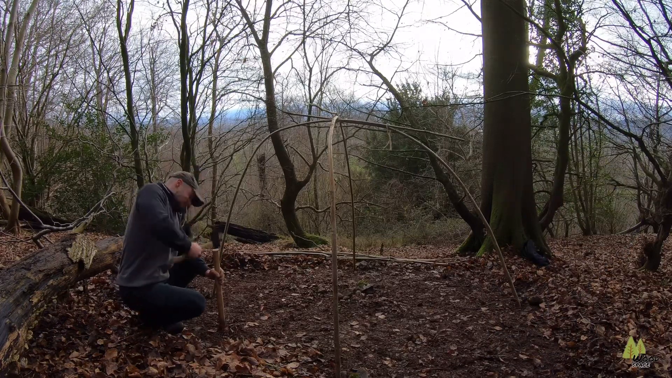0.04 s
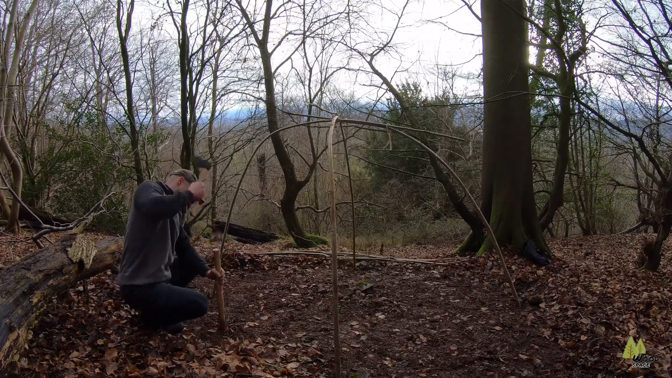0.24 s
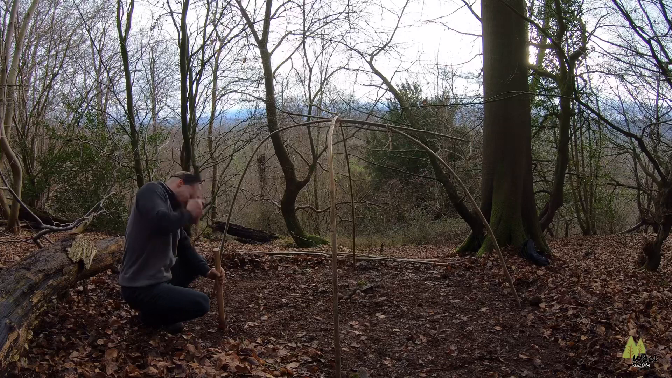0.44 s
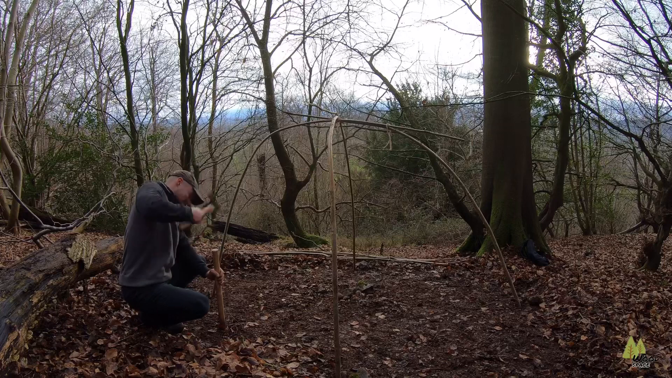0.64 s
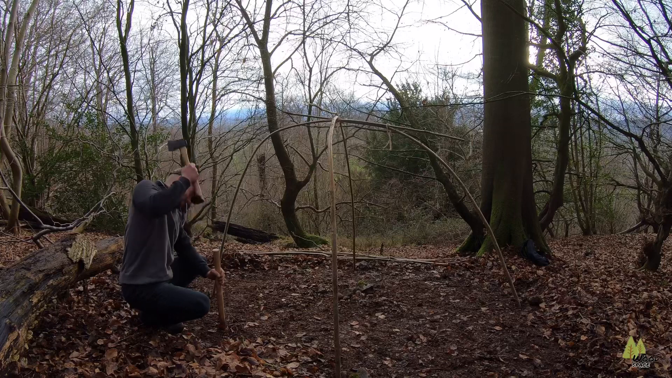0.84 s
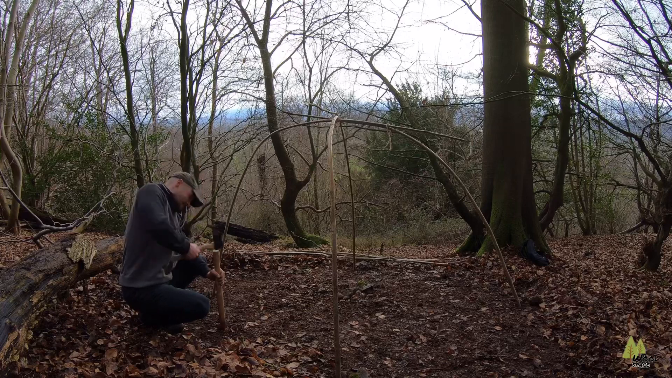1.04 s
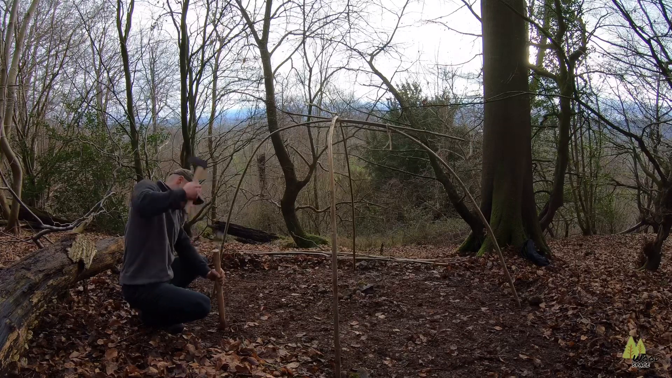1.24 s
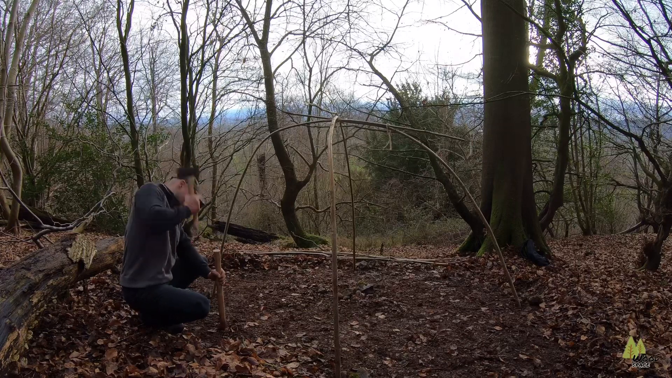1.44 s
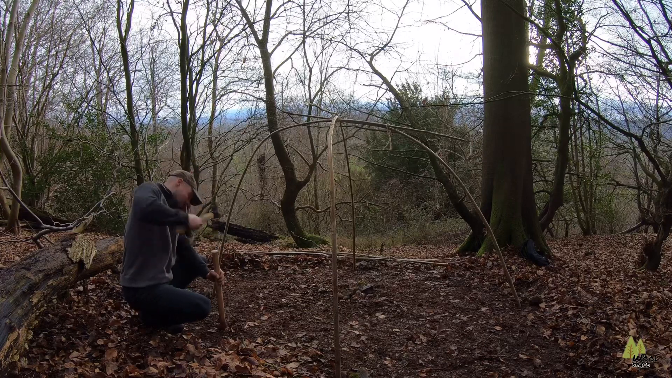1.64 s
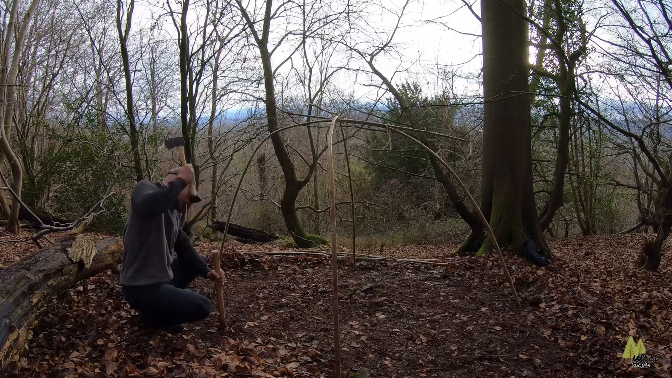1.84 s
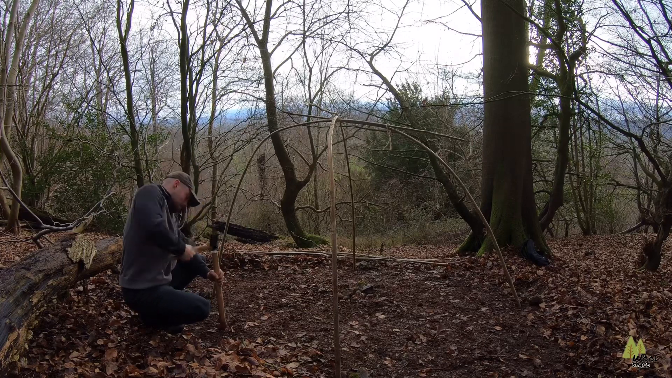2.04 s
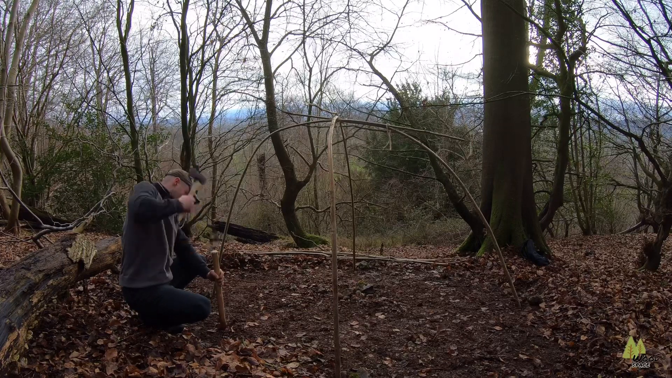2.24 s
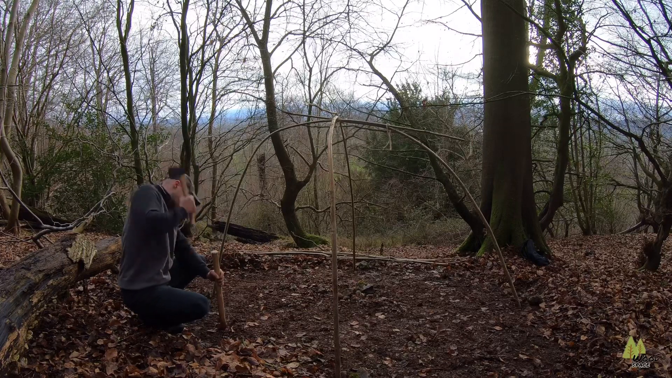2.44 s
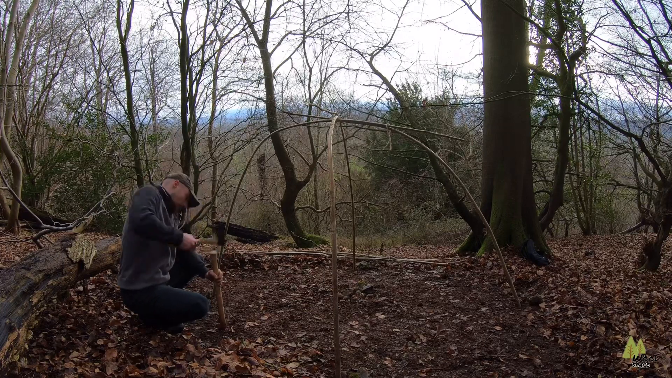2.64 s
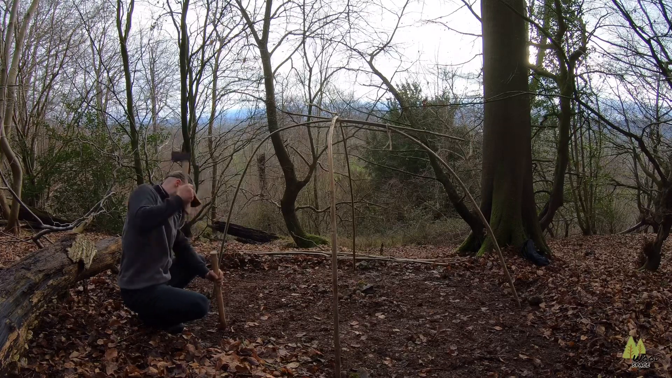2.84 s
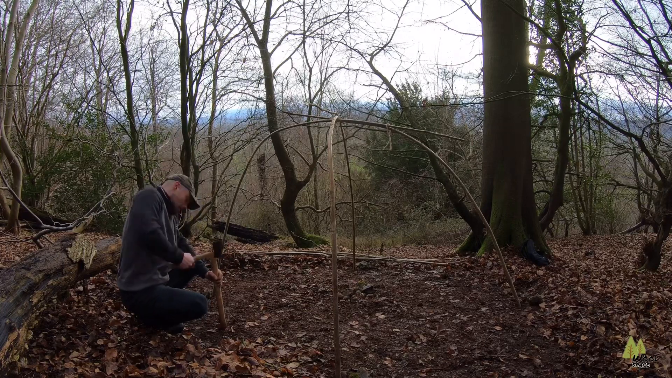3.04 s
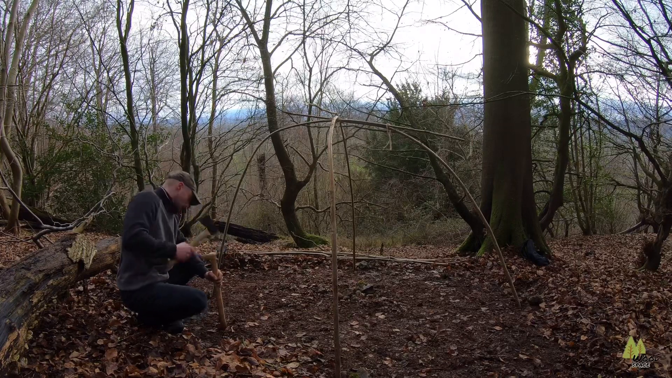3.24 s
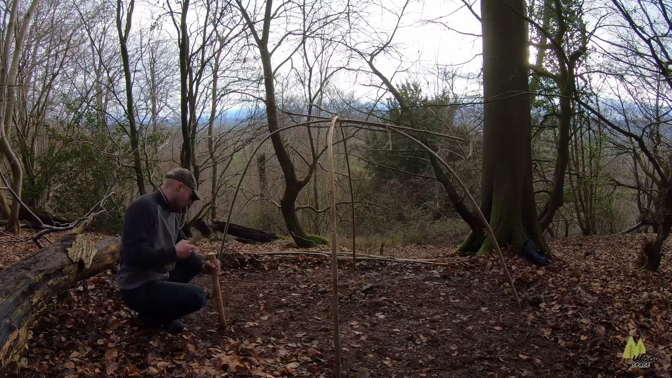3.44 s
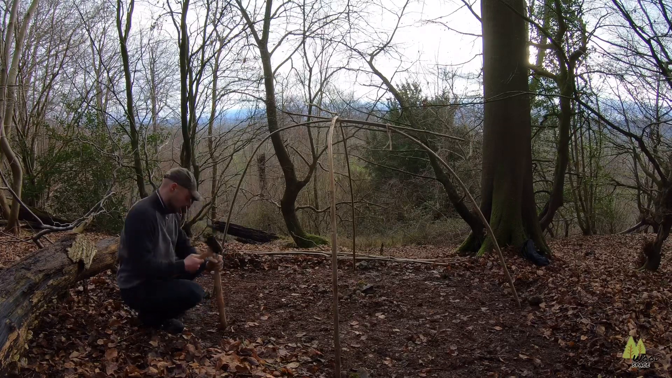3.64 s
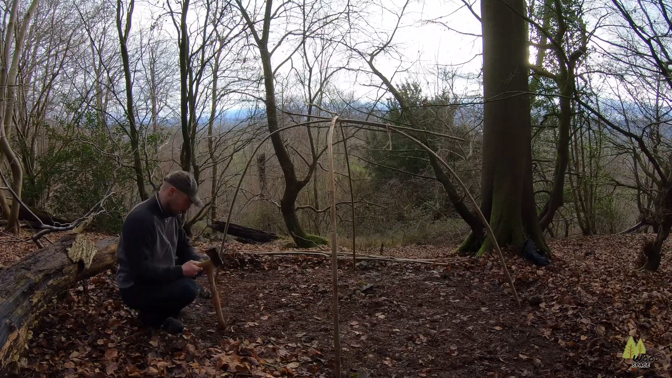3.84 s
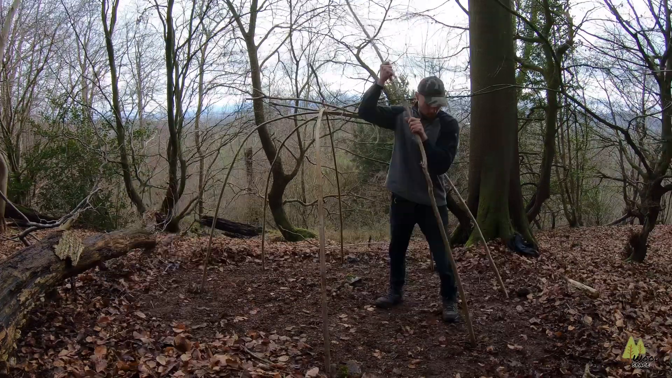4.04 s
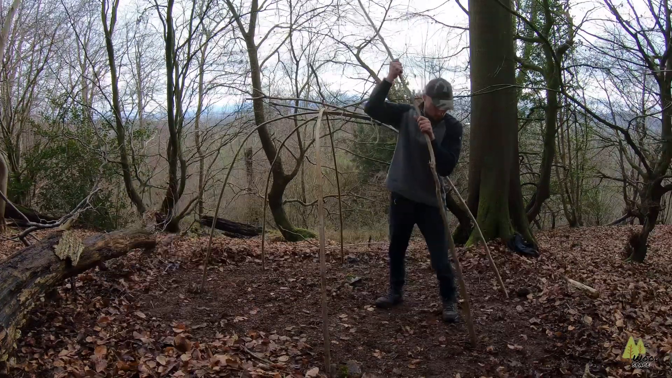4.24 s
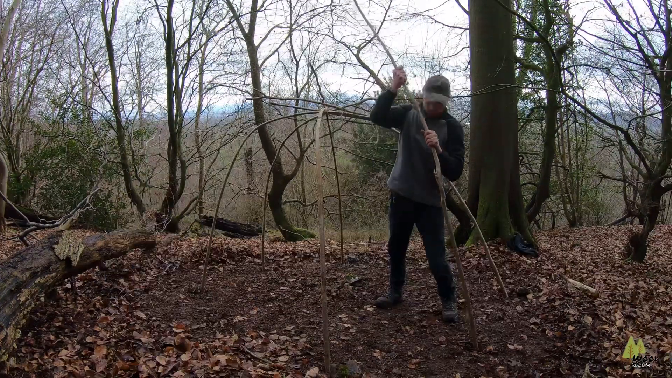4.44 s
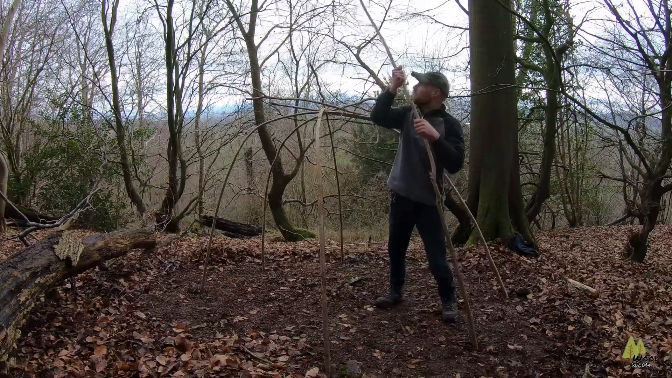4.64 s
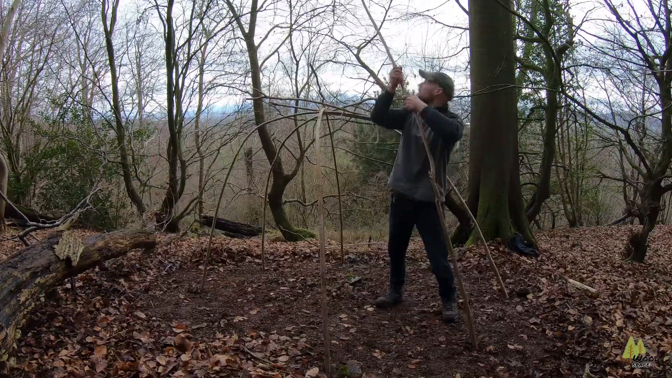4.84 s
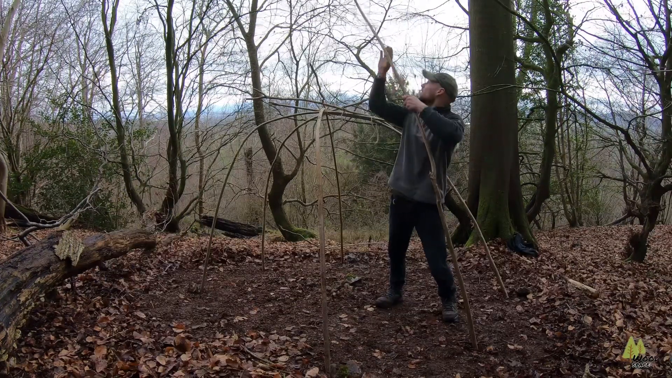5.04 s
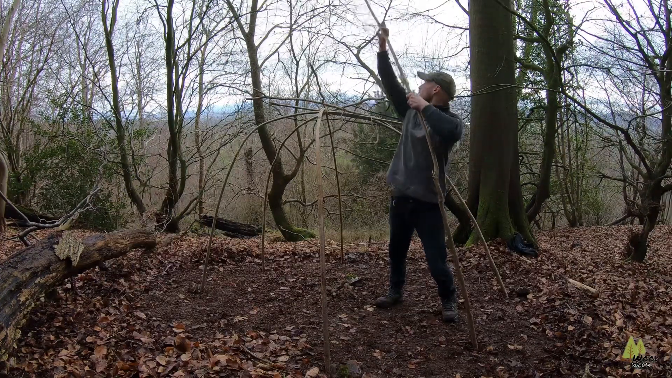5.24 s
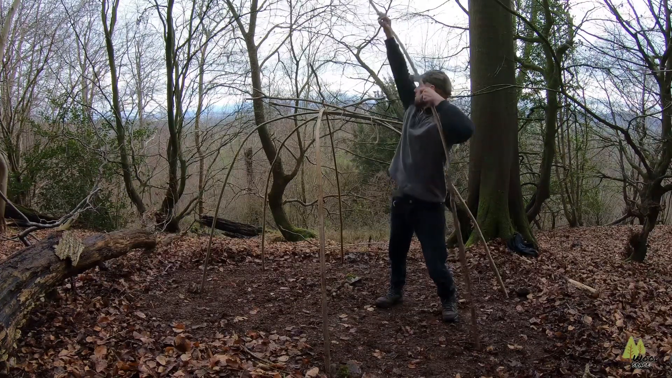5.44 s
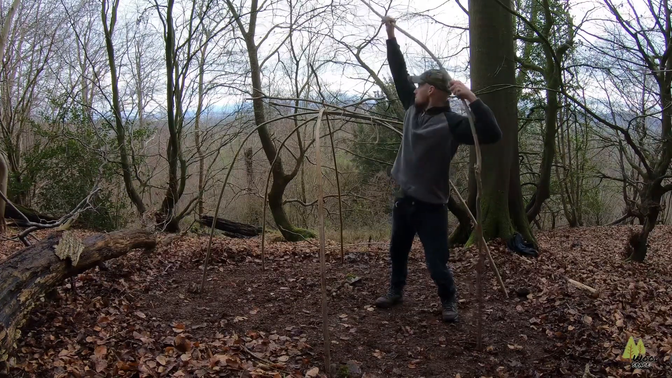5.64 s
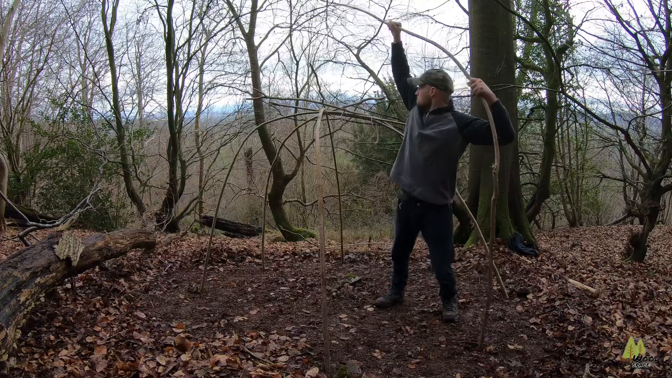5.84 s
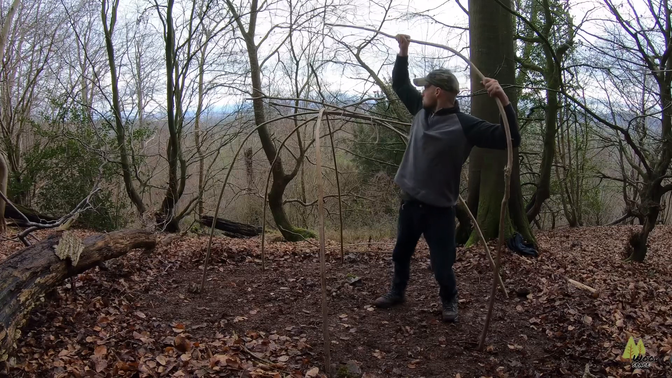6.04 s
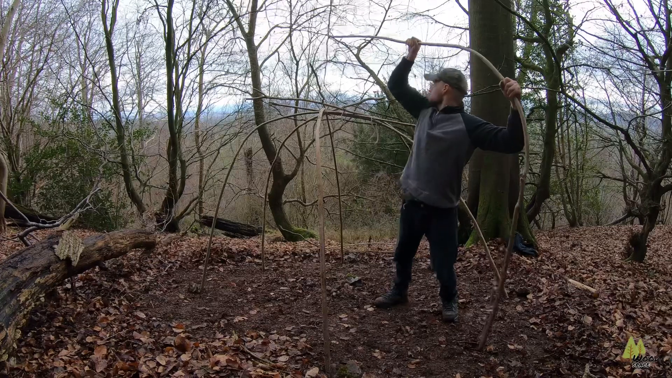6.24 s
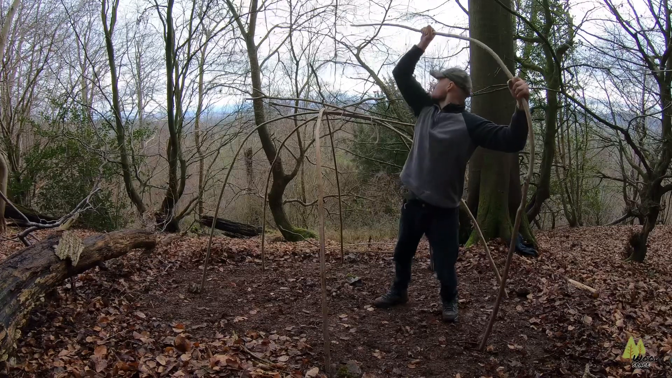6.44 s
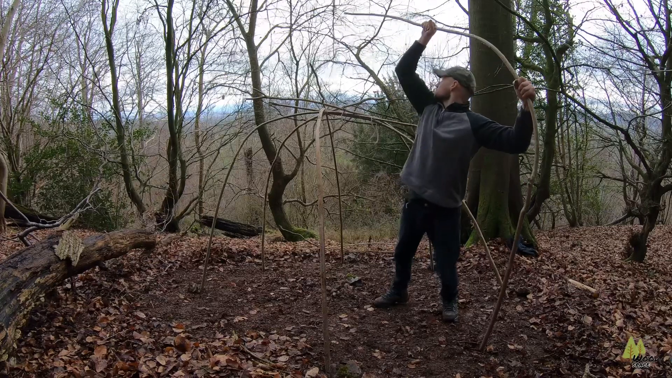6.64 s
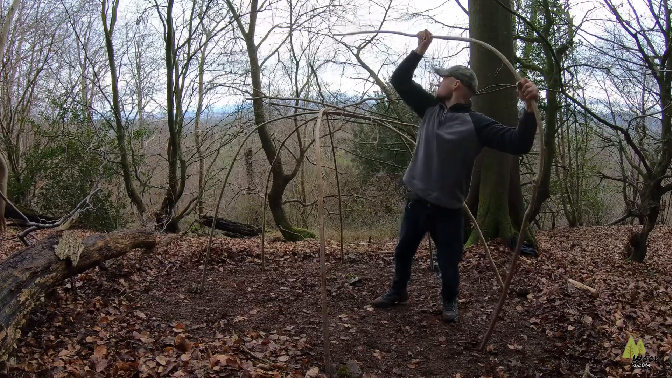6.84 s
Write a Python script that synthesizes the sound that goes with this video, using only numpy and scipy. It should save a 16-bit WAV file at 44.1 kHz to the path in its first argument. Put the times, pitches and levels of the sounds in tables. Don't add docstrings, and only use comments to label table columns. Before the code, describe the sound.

A stake is hammered twice a second among bare trees, woody cracks echoing; after a cut, a deeper thump, twig snaps, leaf rustle and wind puffs.

```python
import sys
import numpy as np
from scipy import signal
from scipy.io import wavfile
from scipy.ndimage import uniform_filter1d

SR = 44100
rng = np.random.default_rng(int(sys.argv[2]) if len(sys.argv) > 2 else 0)


def decibels_to_gain(level_db):
    exponent = np.asarray(level_db, float) / 20
    return 10 ** exponent


def int16_out(signal):
    q = np.round(np.clip(np.atleast_2d(signal).T, -1, 1) * 32767)
    wavfile.write(sys.argv[1], SR, q.astype(np.int16))


N = 304274

CUT_S = (4.058, 4.112)

# (frequency [Hz], level per Hz [dB])
AIR_SPECTRUM = [(15, -42), (25, -8), (64, 0), (118, -8.5), (151, 4.5), (208, 6), (315, -8.5), (945, -3),
                (1300, -8), (1870, -19.5), (2050, -23), (2300, -21.5), (2990, -43.5), (5060, -120)]
AIR_DB = (-60.5, -58.5)
TREETOP_DB, QUIET_TOP_HZ = -83, 11000

# (start [s], length [s], level [dB], tread weight [0 light to 1 heavy])
RUSTLES = [(3.388, 0.15, -76.5, 0.23), (3.672, .015, -90, 0.4), (3.728, 0.2, -79, 0.76),
           (4.361, 0.058, -60, .4), (4.384, 0.13, -59.5, 0.2), (4.59, 0.017, -58.5, .2),
           (4.689, 0.16, -72, 0.18), (4.862, 0.2, -70.5, 0.16), (5.223, 0.048, -69, 0.07),
           (5.346, 0.075, -66.5, 0.21), (5.595, 0.064, -57, 0.23), (5.693, 0.05, -54.5, 0.39),
           (5.796, 0.015, -66, .4), (5.925, 0.12, -55.5, 0.58), (5.946, 0.029, -65.5, 1.08),
           (6.15, .05, -76, 0.66), (6.35, .25, -77, 0.7), (6.611, 0.11, -74.5, 0.46),
           (6.769, 0.054, -78, .2)]
RUSTLE_ATTACK_S, RUSTLE_RELEASE_S = .012, .028
BODY_DB, TREBLE_DB = (-13, 24), (2.5, -49.5)
LITTER_DB, LITTER_WEIGHT = (-83, -72.5), 0.05

# (time [s], peak level [dB], bending mode [Hz], bending level [dB], upper mode level [dB])
BLOWS = [
    (0.0643, -5.5, 810, -14.5, 1.5),
    (0.5558, -6.5, 850, -14, 1.5),
    (1.0632, -5, 850, -18, -2.5),
    (1.562, -3.5, 845, -21, -3),
    (2.0567, -4, 740, -20.5, -10.5),
    (2.5729, -13, 950, -2.5, -6),
    (3.0587, -7, 950, -15.5, -7),
]
# (length mode [Hz], upper mode [Hz], thud [dB], far echo [dB], echo tilt [dB per octave])
LANDINGS = [
    (2300, 3640, -17, -15.5, 3.5),
    (2270, 3530, -15.5, -15, 0.5),
    (2330, 3370, -15, -14.5, 1),
    (2350, 3530, -15, -14, 0.5),
    (2294, 3550, -15.5, -16, -1),
    (2230, 4050, -13, -34.5, -3),
    (2153, 3500, -15.5, -17, -1),
]
# (frequency [Hz], level [dB], left minus right [dB])
SIDE_MODES = [(1674, -13.5, 6.5), (3185, -9, -3.5), (4330, -17, 3.5), (5360, -24, 8), (7096, -34.5, 5)]
# (frequency [Hz], level [dB], t60 [s])
HEAD_RING = [(4100, -45, .35), (7500, -62, .4)]
LEAD_S, CONTACT_S = 0.00028, 0.002
AFTER_DB, AFTER_S = -11, 0.0024
CRACK_DB, CRACK_PER_TILT = -38.5, 2.2

# (frequency [Hz], level [dB], t60 [s])
TRUNK_BANDS = [(403.7, -64.5, 0.63), (740, -59, 0.48), (965, -49, 0.67), (1512, -42, 0.57),
               (1950, -42.5, 1), (2630, -42, 0.99), (3500, -44.5, 0.82), (5700, -53, 0.6),
               (6670, -56, 0.21), (8600, -61, 0.14)]
BLOOM_S, NEAR_S = .135, 0.083
TRUNK_LIKE = 0.5
NEAR_DB, NEAR_PER_TILT = -7, -1.1

# (frequency [Hz], level [dB], spread [s])
SOIL_PACKETS = [(179.8, -1, .0058), (75, -15.5, 0.011), (252, -13, 0.0021), (135, -11, 0.0027)]
ARRIVALS_S = (.0117, .014, .0095, .024)
# (delay [s], level [dB], side level [dB])
SOIL_ECHOES = [(0.041, -26.5, -3), (.05, -27.5, -16.5)]
# (time [s], level [dB], pitch ratio [1])
POLE = (4.3883, -16, .88)
RUMBLE_DB, RUMBLE_S = -22, .045

# (start [s], length [s], pitch [Hz], level [dB], sag [Hz per s])
BIRDS = [
    (.33, .17, 7450, -88, 3000),
    (.72, .22, 7250, -88, 1500),
    (2.82, .15, 4090, -80, 300),
    (3.46, .32, 7170, -80, 200),
    (3.8, .13, 7050, -91, 800),
    (3.79, .28, 5150, -83, 100),
]
BIRD_EDGE_S = .025

# (time [s], peak level [dB], mode [Hz], treble level [dB])
SNAPS = [(4.3880, -15.5, 333, -25), (4.3888, -16.5, 2440, -9.5), (4.3922, -16.5, 3240, -37),
         (4.4223, -12, 3500, -43), (4.4294, -45, 2430, -24), (4.6106, -36.5, 3400, -7.5),
         (4.8771, -57, 3700, -0.5), (5.129, -64, 3220, 10.5), (5.2335, -48, 5700, -5),
         (5.3948, -43, 5200, -17), (5.5144, -54, 5030, -3), (5.5946, -35.5, 2620, 1.5),
         (5.5985, -28.5, 5030, -17), (5.6148, -42.5, 2580, 7), (5.6323, -37, 2460, -6),
         (5.6411, -33.5, 3500, -18), (5.7159, -35, 2730, -31), (5.744, -39.5, 3470, -24.5),
         (5.8104, -43, 3150, -18), (5.934, -35.5, 3040, -35), (5.9472, -36, 3060, -34),
         (5.9623, -38, 3500, -29), (5.986, -26.5, 2900, -37), (6.0174, -40, 2820, -34),
         (6.0551, -33, 2500, -26), (6.1588, -47.5, 2960, -24), (6.3204, -51.5, 3550, -23),
         (6.6555, -55, 3280, 7.5), (6.7854, -66, 3800, -21), (6.8104, -55, 3670, -10.5)]
SNAP_PAN_DB = -1

# (start [s], length [s], level [dB], left minus right [dB])
GUSTS = [
    (4.88, 0.086, -66, 3),
    (5.15, 0.089, -62, 6),
    (5.4, 0.6, -71, 4),
    (5.928, 0.21, -54.5, 10),
    (6.15, 0.41, -66, 10.5),
    (6.499, 0.026, -48.5, -6),
    (6.603, 0.17, -54, 3),
]
GUST_EDGE_S = .04

GHOST_S = .0107
GHOST_DB, LOW_GHOST_DB = (-28, -44), -21

APART = np.array([[1], [-1]])


def band(x, lo_hz, hi_hz, order=2):
    edges = [lo_hz, min(hi_hz, .45 * SR)]
    return signal.sosfilt(signal.butter(order, edges, "band", fs=SR, output="sos"), x)


def unit(x):
    return x / np.sqrt(np.mean(x ** 2))


def pan(db):
    return decibels_to_gain(np.array([db, -db]) / 2).reshape(2, -1)


def add(out, s, x):
    i = int(s * SR)
    out[:, i:i + x.shape[-1]] += x[..., :N - i]


def curves(start, length, attack, release):
    t = np.arange(N) / SR - start
    return np.clip(t / attack, 0, 1) ** 2 * np.exp(-np.clip(t - length, 0, None) / release)


def walk(rate):
    k = int(SR / rate)
    held = np.repeat(rng.standard_normal(N // k + 1), k)
    return 1.3 * uniform_filter1d(uniform_filter1d(held, k), k)[:N]


def air():
    out, (hz_at, db_at) = 0, np.transpose(AIR_SPECTRUM)
    for hz in 30 * 2 ** np.arange(0, 7, 1 / 3):
        mid, side = band(rng.standard_normal((2, N)), hz / 1.18, hz * 1.18)
        db = np.interp(np.log(hz), np.log(hz_at), db_at) + walk(6)
        width = np.clip(0.2 + hz / 1500., 0, .8)
        out = out + decibels_to_gain(db) * (mid + width * side * APART)
    treetops = decibels_to_gain(TREETOP_DB) * unit(band(rng.standard_normal((2, N)), 1800, 5500))
    level = decibels_to_gain(np.where(np.arange(N) / SR < CUT_S[1], *AIR_DB))
    return unit(out) * level + treetops


def leaves():
    struck = rng.random((3, N)) < .2
    size = decibels_to_gain(2.8 * np.minimum(rng.exponential(size=(3, N)), 6))
    grains = rng.standard_normal((3, N)) * struck * size
    grains = grains[0] + .6 * grains[1:]
    clumps = decibels_to_gain(2.8 * walk(160))
    middle = unit(band(grains, 2100, 4200, order=3))
    body = unit(band(grains, 220, 2800, order=3))
    treble = unit(band(grains, 4460, 8600, order=3))

    def tread(weight):
        body_gain = decibels_to_gain(BODY_DB[0] + BODY_DB[1] * weight)
        treble_gain = decibels_to_gain(TREBLE_DB[0] + TREBLE_DB[1] * weight)
        return middle + body_gain * body + treble_gain * treble

    stir_db = np.where(np.arange(N) / SR < CUT_S[1], *LITTER_DB) + 1.79 * walk(9)
    out = decibels_to_gain(stir_db) * tread(LITTER_WEIGHT)
    for s, length, db, weight in RUSTLES:
        swell = curves(s, length, RUSTLE_ATTACK_S, RUSTLE_RELEASE_S)
        out = out + decibels_to_gain(db) * clumps * swell * tread(weight)
    return out


def stake():
    out, t = np.zeros((2, N)), np.arange(9000) / SR
    rise = np.sin(np.pi / 2 * np.clip(t / .0009, 0, 1)) ** 2
    held = rise / (1 + (t / CONTACT_S) ** 5) + decibels_to_gain(AFTER_DB) * rise * np.exp(-t / AFTER_S)
    turn = 2 * np.pi * (t - .0014)
    for (s, db, bend_hz, bend_db, upper_db), (hz, upper_hz, *_, tilt_db) in zip(BLOWS, LANDINGS):
        modes = decibels_to_gain(-1.5) * np.sin(hz * turn) * pan(2.3)
        modes = modes + decibels_to_gain(upper_db - 3.0) * np.sin(upper_hz * turn) * pan(-3.7)
        modes = modes + sum(decibels_to_gain(d) * np.cos(f * turn) * pan(p) for f, d, p in SIDE_MODES)

        grit = rng.standard_normal((2, len(t)))
        crack = unit(band(grit[0] + .6 * grit[1] * APART, 6500, 12000)) * pan(2.5)
        crack = decibels_to_gain(CRACK_DB + CRACK_PER_TILT * tilt_db) * crack

        bend_fade = rise / (1 + (t / .003) ** 4)
        bend = decibels_to_gain(.85 * bend_db + 1.5) * np.cos(bend_hz * turn) * bend_fade * pan(2.5)

        fibres = unit(band(grit[1] + 0.38 * grit[0] * APART, 1100, 2924, order=3))
        fibres = decibels_to_gain(bend_db + 4.0) * fibres * rise * np.exp(-t / 0.004)

        ring = sum(decibels_to_gain(d) * unit(band(grit, f / 1.02, f * 1.02)) * 1000 ** (-t / t60)
                   for f, d, t60 in HEAD_RING)
        add(out, s - LEAD_S, decibels_to_gain(db) * (held * (crack - modes) - bend + fibres + rise * ring))
    return out


def trunks():
    out, t = np.zeros((2, N)), np.arange(int(.9 * SR)) / SR
    for (s, *_), (*_, far_db, tilt_db) in zip(BLOWS, LANDINGS):
        near = decibels_to_gain(NEAR_DB + NEAR_PER_TILT * tilt_db) * np.exp(-t / NEAR_S)
        for hz, db, t60 in TRUNK_BANDS:
            mid, side = band(rng.standard_normal((2, len(t))), hz / 1.3, hz * 1.2, order=5)
            bloom = np.clip(t / BLOOM_S, 0, 1) ** 1.8
            far = decibels_to_gain(far_db) * bloom * 1000 ** (-np.clip(t - BLOOM_S, 0, 1) / t60)
            fade = (far + near) * np.clip(t / 0.005, 0, 1)
            like = np.clip(TRUNK_LIKE * 2000 / hz, 0, .9)
            both = np.sqrt(1 + like) * unit(mid) + np.sqrt(1 - like) * unit(side) * APART
            add(out, s, decibels_to_gain(db + tilt_db * np.log2(hz / 2000)) * fade * both)
    return out


def ground():
    out, t = np.zeros((2, N)), np.arange(9000) / SR
    thuds = [(blow[0], landing[2], 1) for blow, landing in zip(BLOWS, LANDINGS)]
    for s, db, pitch in thuds + [POLE]:
        wave = 0
        for (hz, d, spread), late in zip(SOIL_PACKETS, ARRIVALS_S):
            packet = np.exp(-((t - late) / spread) ** 2)
            wave = wave - decibels_to_gain(d) * packet * np.cos(2 * np.pi * pitch * hz * (t - late))
        wave = wave * np.clip(t / .003, 0, 1)
        add(out, s, decibels_to_gain(db + 7.0) * wave * pan(-1.3))
        for late, d, side_db in SOIL_ECHOES:
            add(out, s + late, decibels_to_gain(db + d) * wave * (1 + decibels_to_gain(side_db + 3.5) * APART))

        noise = rng.standard_normal((3, len(t)))
        rumble = unit(band(noise[0] + 1.7 * noise[1:], 76, 190))
        rumble = rumble * np.clip(t / 0.0067, 0, 1) * np.exp(-(t / RUMBLE_S / 2) ** 2)
        add(out, s, decibels_to_gain(db + RUMBLE_DB) * rumble)
    return signal.sosfiltfilt(signal.butter(2, 45, "high", fs=SR, output="sos"), out)


def birds():
    out, t = 0, np.arange(N) / SR
    for s, length, hz, db, sag in BIRDS:
        pitch = hz - sag * (t - s - length / 2)
        flicker = decibels_to_gain(2.5 * walk(50))
        whistle = flicker * np.sin(2 * np.pi * np.cumsum(pitch + 3e5 / hz * walk(600)) / SR)
        out = out + curves(s, length, BIRD_EDGE_S, BIRD_EDGE_S) * decibels_to_gain(db + 3.0) * whistle
    return out * pan(0.63)


def snaps():
    out, t = np.zeros((2, N)), np.arange(6000) / SR
    rise = np.clip(t / .0006, 0, 1) ** 2
    for s, db, hz, treble_db in SNAPS:
        grit = rng.standard_normal((5, len(t)))
        mode = np.sin(2 * np.pi * hz * t) * np.exp(-t / (0.0013 + 0.95 / hz))
        tail = unit(band(grit[0] + .4 * grit[1:3], hz / 2, hz * 1.3, order=3))
        tail = .35 * tail * np.exp(-t / .003)
        wash = decibels_to_gain(-22.5) * unit(band(grit[3:], 620, 3300, order=3)) * np.exp(-t / 0.021)
        splinter = decibels_to_gain(treble_db) * unit(band(grit[2], 4500, 9500)) * np.exp(-t / .0014)
        add(out, s, decibels_to_gain(db) * rise * (mode + tail + wash + splinter) * pan(SNAP_PAN_DB))
    return out


def wind():
    gusts = sum(decibels_to_gain(db) * curves(s, length, GUST_EDGE_S, GUST_EDGE_S) * pan(pan_db)
                for s, length, db, pan_db in GUSTS)
    noise = rng.standard_normal((3, N))
    return gusts * unit(band(noise[0] + 1.9 * noise[1:], 20.4, 74.0))


def scene():
    t = np.arange(N) / SR
    gate = np.clip(np.maximum(CUT_S[0] - t, t - CUT_S[1]) / 0.00282, 0, 1)
    quiet = air() + leaves() + trunks() + birds() + snaps() + wind()
    quiet = signal.sosfilt(signal.butter(5, QUIET_TOP_HZ, fs=SR, output="sos"), quiet)
    return gate * (stake() + ground() + quiet)


def top_cut(x):
    return signal.sosfilt(signal.butter(12, 16560, fs=SR, output="sos"), x)


def record(dry):
    step = int(GHOST_S * SR)
    thin, low = band(dry, 1500, 10000, order=1), band(dry, 450, 1200)
    ghosts = sum(decibels_to_gain(db) * np.roll(thin, -(k + 1) * step, axis=1) for k, db in enumerate(GHOST_DB))
    low_ghosts = np.roll(low, -step, axis=1) + np.roll(low, -step // 2, axis=1)
    ghosts = ghosts + decibels_to_gain(LOW_GHOST_DB) * low_ghosts
    return top_cut(np.clip(dry + ghosts, -1, 1))


dry = scene()
out = record(dry)
int16_out(out)
```